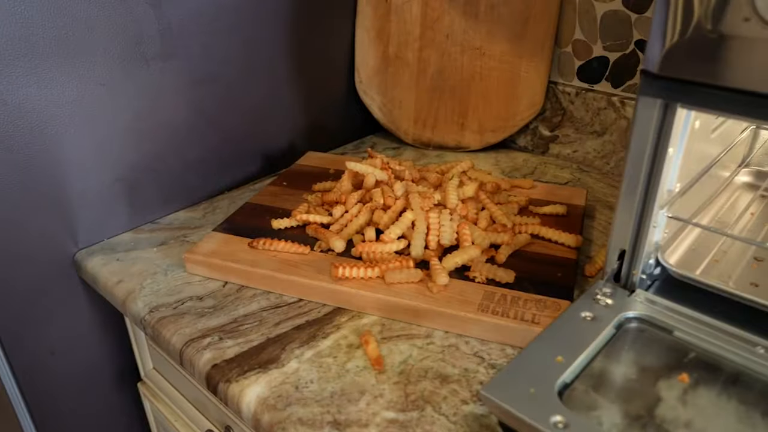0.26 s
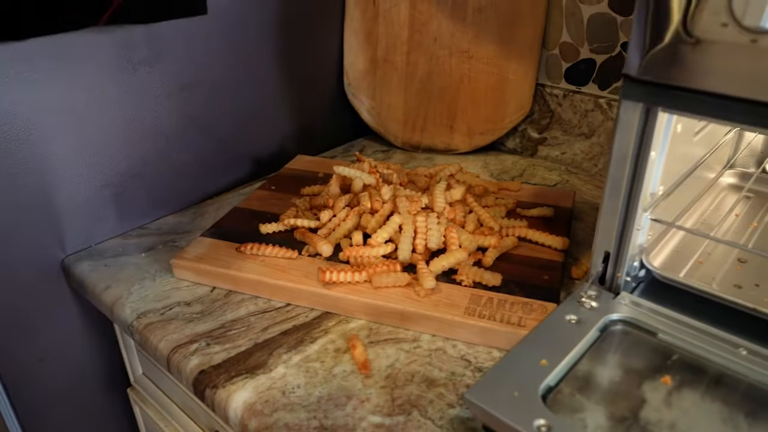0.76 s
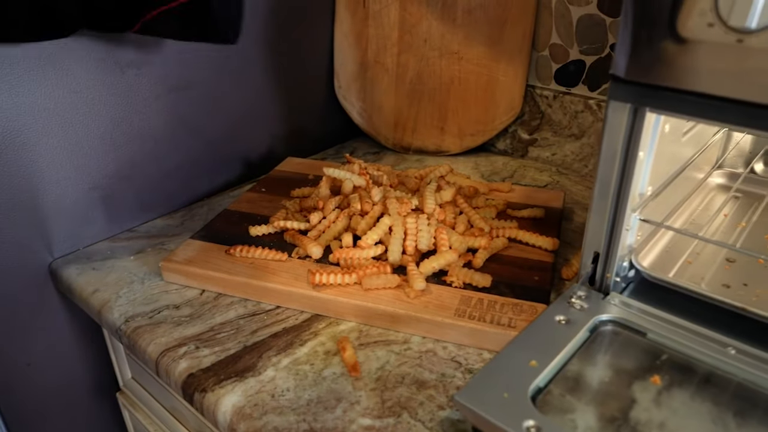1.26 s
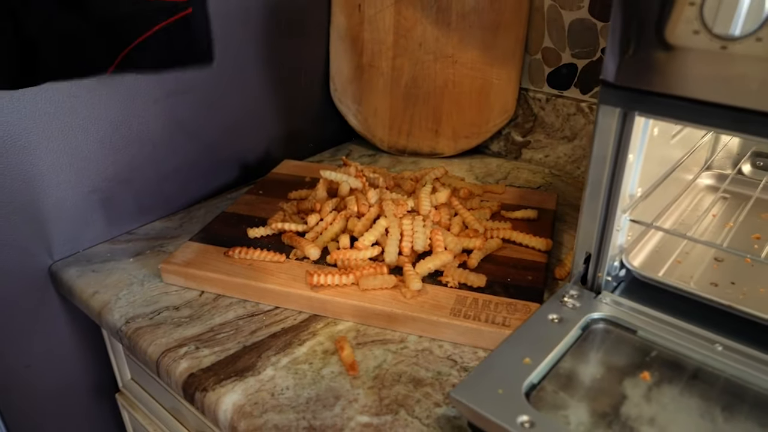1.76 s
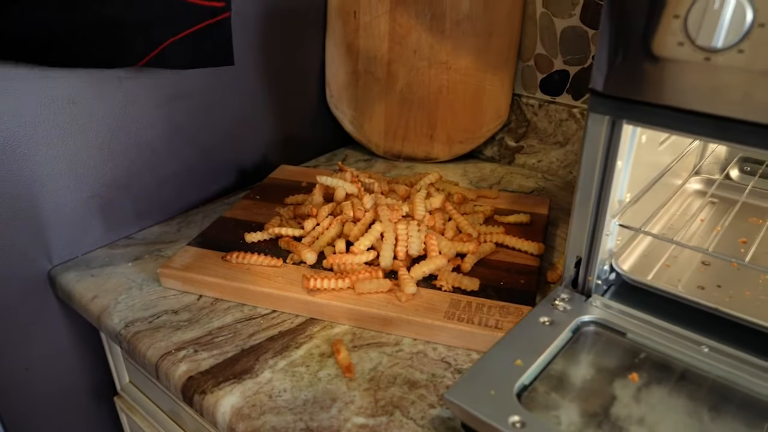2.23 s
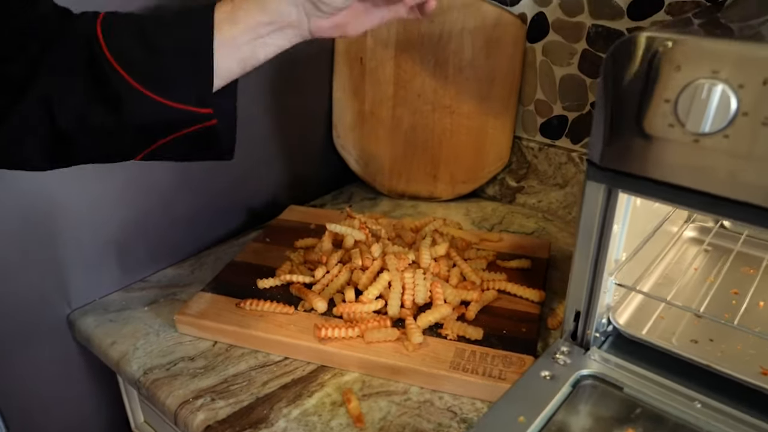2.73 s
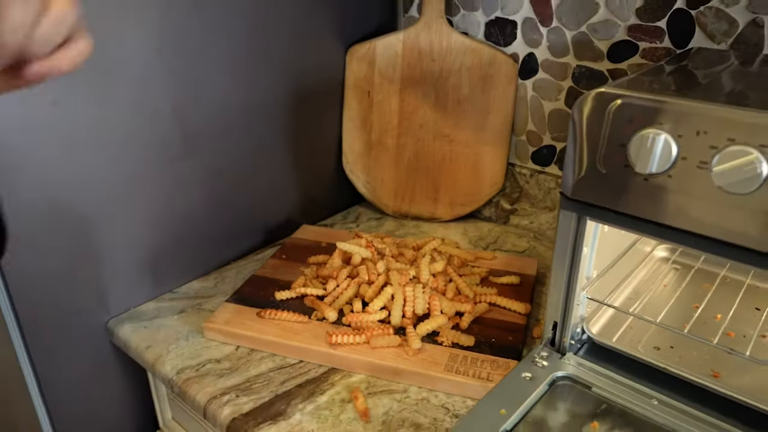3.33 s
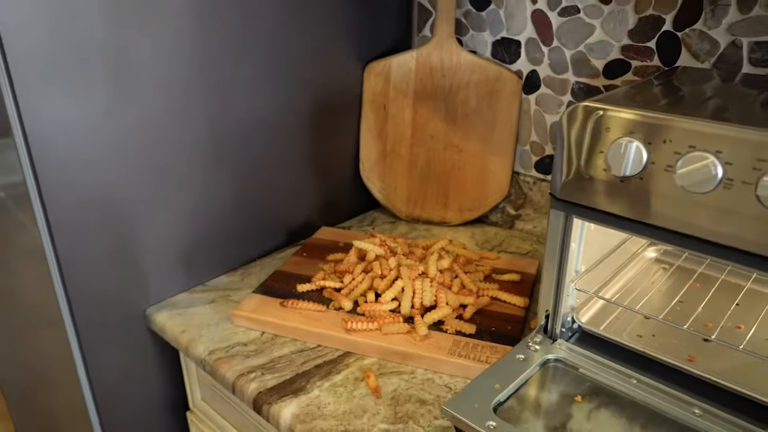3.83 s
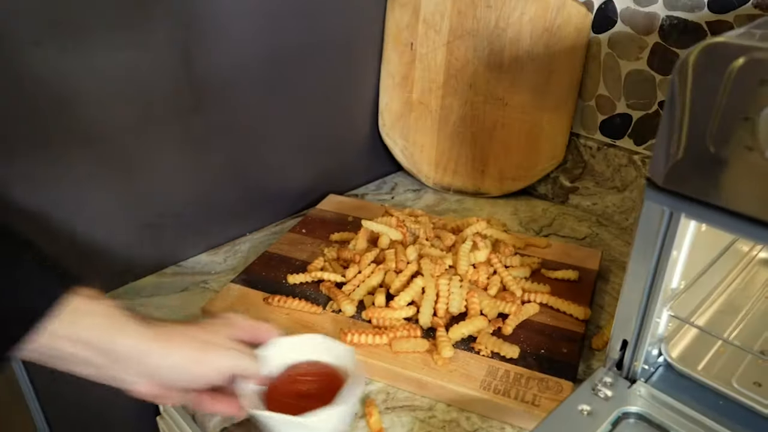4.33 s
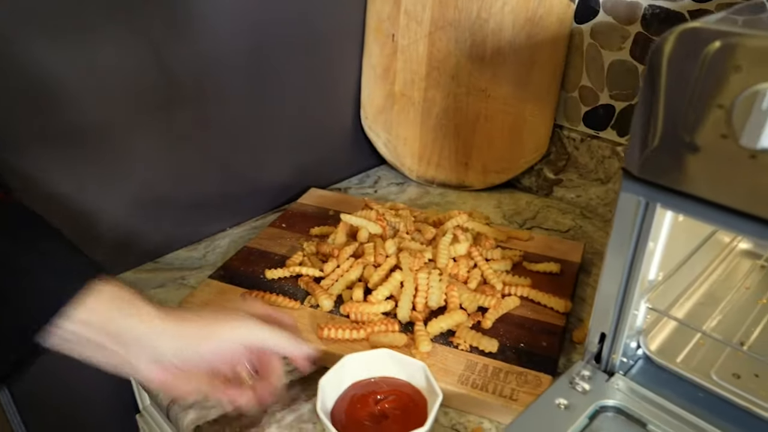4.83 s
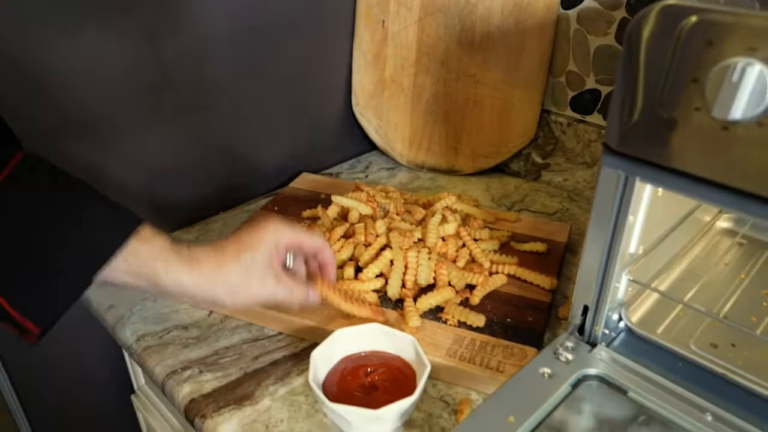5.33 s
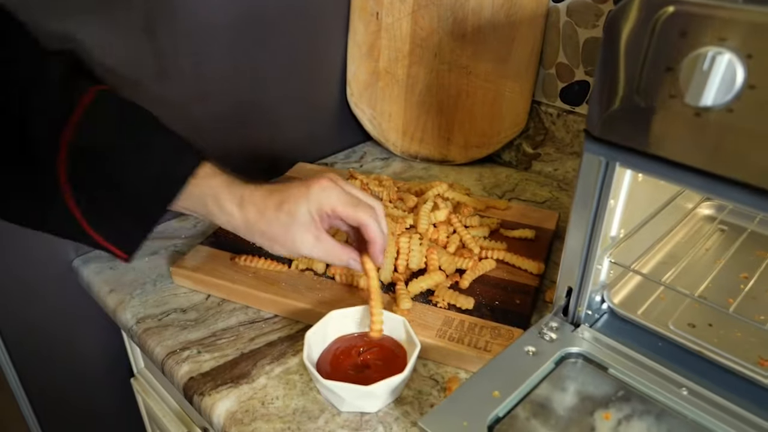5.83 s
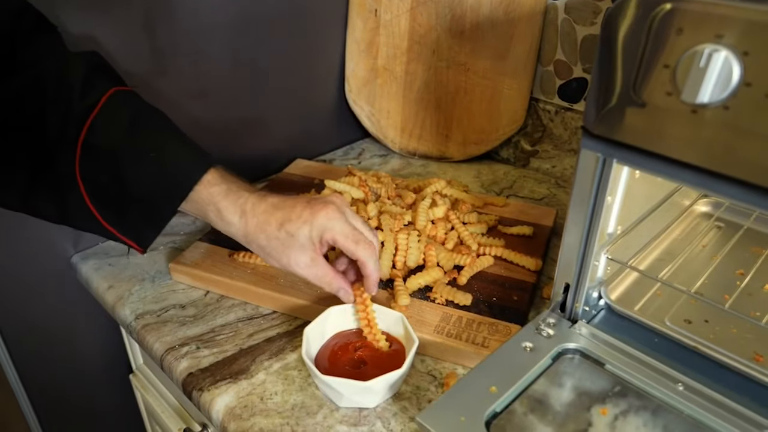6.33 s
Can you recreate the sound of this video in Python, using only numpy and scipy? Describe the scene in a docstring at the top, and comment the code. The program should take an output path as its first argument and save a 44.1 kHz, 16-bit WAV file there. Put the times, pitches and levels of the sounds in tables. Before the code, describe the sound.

In a small kitchen with a faint appliance hum and hiss, a salt shaker is shaken over fries in nine quick, gritty strokes, the grains rattling back between them. A sleeve rustles softly. Then a small ceramic bowl is set down on the counter with a sharp clink and briefly rocks to rest. A few light ticks follow as a fry is picked up. Everything sounds fairly close, with slight room reflections.

```python
"""Over a faint appliance hum and a hiss of air, salt slides in a tipped shaker and is shaken over fries.
Each of nine strokes throws the grains against the cap, exciting the hollow body; then they rattle back.
A sleeve rustles by friction. A small ceramic bowl, set down by a wooden board, rings in its normal modes
as it rocks to rest, and a fry is picked up with a few light ticks. A small kitchen reflects these sounds."""
import sys
import numpy as np
from scipy import signal
from scipy.fft import rfft, irfft
from scipy.io import wavfile

SR = 44100
rng = np.random.default_rng(int(sys.argv[2]) if len(sys.argv) > 2 else 0)


def to_wav(sig):
    """Store sig (one row per channel, or 1-D mono) as 16-bit WAV at the path in sys.argv[1].

    Samples outside -1..1 are clipped; the rate is SR.
    """
    pcm = np.clip(np.atleast_2d(sig), -1, 1) * 32767
    pcm = np.round(pcm).astype(np.int16)
    wavfile.write(sys.argv[1], SR, pcm.T)  # frames by channels


N = 289631
TIME = np.arange(N) / SR

# salt thrown at the cap: (start [s], length [s], level [dB], grit [dB], cavity pitch [ratio])
THROWS = [(0.501, 0.084, -29, 1, 1.12), (0.878, 0.041, -24.5, -1.5, 0.97), (1.183, 0.052, -26, -1.5, 0.94),
          (1.492, 0.044, -26, 0.5, 0.99), (1.776, 0.04, -29.5, 0.5, 1.11), (2.061, 0.057, -27, -1, 1.1),
          (2.357, 0.055, -30.5, 0.2, 1.05), (2.643, .057, -29.5, -0.1, 1.03),
          (2.933, 0.055, -26, -4.5, 1.03)]
# salt sliding as the shaker tips, then falling back after each throw: (start [s], length [s], level [dB])
RETURNS = [(0.231, 0.07, -46), (.314, 0.035, -39.5), (0.39, 0.048, -51), (0.688, 0.075, -42.5),
           (1.016, 0.059, -39.5), (1.331, 0.064, -42), (1.631, 0.045, -37.5), (1.913, .068, -42),
           (2.217, 0.069, -42), (2.498, 0.083, -40), (2.778, 0.081, -44.5)]


def from_db(db):
    """Decibels as an amplitude ratio."""
    return 10 ** (np.asarray(db) / 20)


def rms_one(x):
    """Normalisation to unit power."""
    return x / np.sqrt(np.mean(x ** 2) + 1e-20)


def at_hz(points, hz):
    """Interpolation on a log-frequency axis."""
    frequencies, values = np.transpose(points)
    return np.interp(np.log(np.maximum(hz, 1)), np.log(frequencies), values)


def colour(x, spectrum, size=8192):
    """Minimum-phase filter with the given spectrum; white noise keeps its power."""
    gain = from_db(at_hz(spectrum, np.fft.rfftfreq(size, 1 / SR)))
    cepstrum = irfft(np.log(gain))
    response = irfft(np.exp(rfft(2 * cepstrum[:size // 2], size)))
    return signal.fftconvolve(x, response / np.linalg.norm(response))[:N]


def resonance(x, hz, width):
    """Damped two-pole resonator with unit peak gain."""
    r = np.exp(-np.pi * width / SR)
    feedback = [1, -2 * r * np.cos(2 * np.pi * hz / SR), r * r]
    return signal.lfilter(np.array([1, 0, -1]) * (1 - r * r) / 2, feedback, x + 1e-18)


def low_pass(x, hz):
    """First-order smoothing."""
    r = np.exp(-2 * np.pi * hz / SR)
    return signal.lfilter([1 - r], [1, -r], x + 1e-18)


def add(out, s, sound):
    """Superposition of a short sound at time s."""
    at = int(round(s * SR))
    out[at:at + len(sound)] += sound[:N - at]


def swell(s, half):
    """Bell-shaped envelope of height 1 around time s."""
    return 1 / (1 + ((TIME - s) / half) ** 2 / 2) ** 2


def drift(hz):
    """Random fluctuation, mostly slower than hz; rms 1."""
    return rms_one(low_pass(low_pass(rng.standard_normal(N), hz), hz))


def narrow_noise(hz, width):
    """Narrow-band noise, heard as an unsteady tone; rms 1."""
    return rms_one(resonance(resonance(rng.standard_normal(N), hz, width), hz, width))


def bursts(rows, t60, size=4096):
    """Exponentially decaying micro-impacts for each (time [s], level [dB])."""
    out = np.zeros(N)
    for s, db in rows:
        add(out, s, rng.choice([-1, 1], size) * from_db(db - 60 * TIME[:size] / t60))
    return out


def grains(per_s, spread_db):
    """Shot noise: independent clicks of uneven size; rms 1."""
    sizes = from_db(spread_db * np.minimum(rng.exponential(1, N), 4)) * rng.choice([-1, 1], N)
    return rms_one(sizes * (rng.random(N) < per_s / SR))


def background():
    """Broadband air noise and a frequency-modulated motor hum; throb and rumble lie mostly on the left."""
    # spectra of the air and the rumble: (frequency [Hz], level [dB])
    air_spectrum = [(20, 8.5), (60, -7), (95, 2.5), (170, -1), (400, -4), (800, -6.5), (1500, -5),
                    (2400, -8.5), (3500, -6.5), (5000, -16.5), (7000, -24), (10000, -30.5), (13000, -33.5),
                    (16000, -56)]
    rumble_spectrum = [(15, -10), (37, 0.5), (50, -0.5), (65, -7.5), (95, -5), (160, -25), (300, -21.5),
                       (700, -32.5), (2000, -54)]
    # unsteady part of the hum: (frequency [Hz], bandwidth [Hz], level [dB])
    hum_bands = [(93.7, 8.1, -71.5), (241.1, 10, -70)]
    # the motor tone grows as the listening point moves: (time [s], level [dB])
    motor_levels = [(3.5, -69), (5, -62)]
    # swells of the low throb: (time [s], half length [s], level [dB])
    throbs = [(0.0, .12, -50), (1.6, 0.38, -52)]
    air = from_db(-61) * colour(rng.standard_normal(N), air_spectrum)
    hum = sum(from_db(db) * narrow_noise(hz, width) for hz, width, db in hum_bands)
    motor_hz = 242 + 2.434 * drift(hz=3.0)
    motor_gain = from_db(np.interp(TIME, *np.transpose(motor_levels)))
    motor = motor_gain * np.sin(2 * np.pi * np.cumsum(motor_hz) / SR)
    throb = sum(from_db(db) * swell(s, half) for s, half, db in throbs) * narrow_noise(hz=75, width=37)
    rumble = from_db(-52) * colour(rng.standard_normal(N), rumble_spectrum)
    return air + hum + motor + throb * from_db([[0], [-11.5]]) + rumble * from_db([[0], [-20]])


def kitchen(x, wet_db, early_db, size=32768):
    """Reverberation: early reflections and a diffuse tail in which each band decays at its own rate."""
    # reflections off counter and walls: (delay [s], level [dB])
    echoes = [(.0031, -13.5), (.0083, -10), (0.0128, -20), (0.0275, -27), (.0335, -29)]
    # spectrum of the tail: (frequency [Hz], level [dB])
    tail_spectrum = [(100, 6.5), (1000, 3), (2000, -1), (4000, 0.5), (8000, -7), (16000, -2.5)]
    # reverberation time: (frequency [Hz], T60 [s])
    decay_times = [(100, 0.91), (500, 0.55), (1800, 0.46), (4000, 0.6), (8000, 0.26), (16000, 0.75)]
    t, tail = TIME[:size], np.zeros(size)
    edges = np.geomspace(60, 17000, 11)
    for low, high in zip(edges, edges[1:]):
        hz = np.sqrt(low * high)
        band_pass = signal.butter(2, [low, high], "band", fs=SR, output="sos")
        band = signal.sosfilt(band_pass, rng.standard_normal(size))
        tail += band * from_db(at_hz(tail_spectrum, hz) - 60 * t / at_hz(decay_times, hz))
    tail *= np.minimum(t / 0.004, 1)
    response = from_db(wet_db) * tail / np.linalg.norm(tail)
    for delay, db in echoes:
        add(response, delay, from_db([db + early_db]))
    return x + signal.fftconvolve(x, response)[:N]


def sleeve():
    """Friction noise: cloth fibres slip in short swells, each with its own brightness."""
    # moves of sleeve and hand: (time [s], half length [s], level [dB], treble gain [dB])
    moves = [(.01, 0.051, -52.5, -25), (3.353, 0.026, -48, -24), (3.531, 0.027, -49.5, 3),
             (3.696, 0.021, -50, -20), (4.055, 0.017, -46, 6), (4.137, 0.045, -49.5, -6.5),
             (5.203, .013, -58.5, -11), (5.412, 0.012, -59.5, 8), (6.14, 0.053, -49, -17)]
    # spectrum of the cloth: (frequency [Hz], level [dB])
    cloth_spectrum = [(400, -10.5), (1200, -7.5), (2200, -3.5), (3600, 2.5), (5500, -5.5), (8000, -14.5),
                      (11000, -22), (16000, -33)]
    fibres = colour(grains(per_s=9100, spread_db=-1.5), cloth_spectrum)
    dull = low_pass(fibres, 3750)
    return sum(from_db(db) * swell(s, half) * (dull + from_db(treble_db) * (fibres - dull))
               for s, half, db, treble_db in moves)


def fry_ticks():
    """Heavily damped impacts as a fry is picked up; the hand also grazes the bowl."""
    # light touches: (time [s], level [dB], frequency [Hz], bandwidth [Hz])
    touches = [(5.4253, -43.5, 7040, 2040), (5.427, -34, 3100, 2400), (5.468, -54, 7600, 5950),
               (5.619, -29.5, 2040, 1650), (5.6188, -55.5, 9000, 7000), (5.789, -36.5, 3500, 1000)]
    taps = sum(resonance(resonance(bursts([(s, db)], t60=0.019), hz, width), hz, width)
               for s, db, hz, width in touches)
    graze = bowl_ring([(5.4253, -47.5, 9000)])
    return from_db(3) * taps + graze


def bowl_ring(blows, size=32768):
    """Modal ringing after each (time [s], level [dB], cutoff [Hz]); soft blows barely excite high modes."""
    # normal modes of the bowl: (frequency [Hz], level [dB], T60 [s])
    modes = [(1240, -19, .04), (1535, -3, 0.02), (1670, -8.5, .018), (1787, 3.5, 0.053), (1784, -20, 0.17),
             (1870, -17.5, .34), (1910, -8, 0.052), (2200, -18, 0.017), (2497, -1, 0.028),
             (2643, -3.5, 0.029), (2910, -3, .03), (3270, -11.5, .045), (3460, -7, 0.031),
             (3840, -9, 0.041), (4040, -8.5, .07), (4100, -18.5, 0.14), (4500, -10, .038), (5300, -17, .02),
             (6600, -9, 0.019), (7100, -24, 0.056)]
    hz, mode_db, t60 = np.array(modes).T[:, :, None]
    out, t = np.zeros(N), TIME[:size]
    vibrations = np.exp(-np.log(1000) * t / t60) * np.sin(2 * np.pi * hz * t)
    for s, db, cutoff_hz in blows:
        strength = from_db(db + mode_db + rng.normal(0, 1.6, hz.shape))
        strength /= np.hypot(1, (hz / cutoff_hz) ** 2)
        sign = rng.choice([-1, 1], hz.shape)
        ring = np.sum(sign * strength * vibrations, axis=0)
        add(out, s, ring * np.minimum(t / 0.00057, 1))   # the contact takes a moment to build
    return out


def bowl():
    """Impact excitation: each landing gives a ceramic ring, a contact transient and a thud in the wood."""
    # the bowl lands and rocks: (time [s], level [dB], contact cutoff [Hz], thud level [dB])
    landings = [(4.3176, -15, 13300, -39), (4.3213, -23.5, 4500, -41), (4.4046, -25.5, 4450, -38.5),
                (4.478, -28, 3200, -35), (4.4882, -29, 2000, -48), (4.509, -33.5, 1770, -59),
                (4.5412, -39.5, 1560, -48)]
    # spectra of the contact crack and the wooden thud: (frequency [Hz], level [dB])
    crack_spectrum = [(500, -15.5), (1100, -8), (1500, 4.5), (2700, -0.5), (4300, 0), (6800, -10.5),
                      (8000, -39), (11000, -32), (16000, -41)]
    thud_spectrum = [(40, -13), (85, 3), (130, 5), (290, -5), (560, 3.5), (680, -3), (860, 4.5),
                     (1100, -3.5), (1600, -8.5), (3000, -36), (9000, -60)]
    ring = bowl_ring([row[:3] for row in landings])
    contact = 0
    for s, db, cutoff_hz, _ in landings:
        crack = from_db(3.5) * colour(bursts([(s, db)], t60=0.022), crack_spectrum)
        snap = from_db(-11) * bursts([(s, db)], t60=0.004)
        softness = signal.butter(3, cutoff_hz, fs=SR, output="sos")
        contact += signal.sosfilt(softness, crack + snap + 1e-18)
    thud = colour(bursts([(s, thud_db) for s, _, _, thud_db in landings], t60=0.075), thud_spectrum)
    return from_db(0.5) * (ring + thud) + contact


def salt_grains(per_s, spread_db, clump_db, clump_hz, pings_per_s, ping_width_hz, ping_db, count=24):
    """Modulated shot noise: grains land in clumps; larger ones ping, more briefly at high pitch; rms 1."""
    pitches = np.geomspace(1400, 12000, count)
    pings = sum(resonance(grains(pings_per_s / count, spread_db), hz, ping_width_hz * hz / pitches[0])
                for hz in pitches)
    impacts = grains(per_s, spread_db) + from_db(ping_db) * rms_one(pings)
    return rms_one(impacts * from_db(clump_db * drift(clump_hz)))


def shower(hail, start, length, shape, size=12000):
    """Envelope of a granular flow: it starts at once, thickens, eases and dies away."""
    start_db, peak_share, end_db, release_s = shape
    t, at = TIME[:size], int(start * SR)
    flow_db = np.interp(t / length, [0, peak_share, 1], [start_db, 0, end_db])
    release_db = 20 * np.maximum(t - length, 0) / release_s
    return hail[at:at + size] * from_db(flow_db - release_db)


def falling_back():
    """Sparse collisions: loose grains scatter down the wall."""
    # flow envelope: (start [dB], peak position [share of length], end [dB], time to fall 20 dB [s])
    envelope = (-0.5, 0.3, -3, 0.06)
    hail = salt_grains(per_s=2000, spread_db=2.5, clump_db=4.0, clump_hz=101.5,
                       pings_per_s=1100, ping_width_hz=69, ping_db=-0.5)
    out = np.zeros(N)
    for start, length, db in RETURNS:
        add(out, start, from_db(db) * shower(hail, start, length, envelope))
    return out


def coarse_strikes(strokes, first_db, follower_db, count, rebound_s=0.0135, scatter_db=2.5):
    """Collisions as (time [s], level [dB]): a crystal leads each stroke and rebounds, a few follow."""
    strikes = []
    for start, length, db, *_ in strokes:
        shares = (np.arange(count) + rng.uniform(0.62, 1, count)) / count
        later = start + rebound_s + shares * (length - rebound_s)
        strikes += [(start, db + first_db), (start + rebound_s, db + first_db)]
        strikes += zip(later, db + follower_db + scatter_db * rng.standard_normal(count))
    return strikes


def crystals(t60=0.012, size=2048):
    """Point excitation: each coarse crystal clicks and rings the wall at a pitch set by where it lands."""
    # single crystals that stand out: (time [s], level [dB])
    lone_strikes = [(.316, -26), (0.779, -38), (1.102, -33.5), (1.478, -36.5), (1.817, -22.5), (1.983, -34),
                    (2.564, -32), (2.808, -33.5), (2.858, -34.5)]
    strikes = coarse_strikes(THROWS, first_db=-9, follower_db=-7.5, count=2)
    strikes += coarse_strikes(RETURNS, first_db=4.5, follower_db=2.5, count=3) + lone_strikes
    out = np.zeros(N)
    for (s, db), hz in zip(strikes, rng.uniform(2030, 4840, len(strikes))):
        click = rng.choice([-1, 1], size) * from_db(db - 60 * TIME[:size] / t60)
        add(out, s, click + from_db(3) * resonance(click, hz, width=174))
    return out


def salt_on_cap():
    """Cavity resonance: salt hits the cap and drives air modes, whose balance shifts as it piles up."""
    # air modes: (frequency [Hz], bandwidth [Hz], level [dB], rise per half throw [dB])
    cavity_modes = [(1560, 250, .5, 0.5), (2207, 157, 3, 2), (3180, 390, 3, 0.7)]
    # flow envelope: (start [dB], peak position [share of length], end [dB], time to fall 20 dB [s])
    envelope = (-8.5, 0.4, -3, 0.04)
    # spectrum of salt on the cap: (frequency [Hz], level [dB])
    cap_spectrum = [(300, -45.5), (700, -24.5), (1050, -17), (1400, -9), (2200, -3), (3300, -5.5),
                    (4200, -5.5), (5200, -9), (7500, -9.5), (10500, -15), (13000, -20.5), (16000, -31.5)]
    hail = salt_grains(per_s=6000, spread_db=2.0, clump_db=2.0, clump_hz=145,
                       pings_per_s=2600, ping_width_hz=63, ping_db=-2.5)
    out = np.zeros(N)
    for start, length, db, grit_db, pitch in THROWS:
        drive = shower(hail, start, length, envelope)
        piled = np.interp(TIME[:len(drive)], [0, length], [-1, 1])
        hollow = sum(resonance(drive * from_db(mode_db + rise_db * piled), hz * pitch, width)
                     for hz, width, mode_db, rise_db in cavity_modes)
        add(out, start, from_db(db) * (hollow + from_db(grit_db) * drive))
    return colour(out, cap_spectrum)


def shaker():
    """Forced vibration: dense throws drive the cap; loose grains and coarse crystals ring the wall."""
    # wall resonances: (frequency [Hz], bandwidth [Hz], level [dB])
    wall_modes = [(1590, 130, -18.5), (2280, 510, -10.5), (2990, 120, 3.5), (3300, 120, 2),
                  (7300, 550, -10.5), (10950, 1100, -2)]
    # spectrum of the loose rattle: (frequency [Hz], level [dB])
    rattle_spectrum = [(300, -32.5), (680, -29), (920, -10), (1100, -9.5), (1450, -3), (2200, -3.5),
                       (3300, -3), (4200, -5.5), (5200, -8.5), (7500, -10), (10800, -16.5), (13000, -22),
                       (16000, -27.5)]
    loose = from_db(-2) * falling_back() + from_db(1) * crystals()
    wall_ring = sum(from_db(db) * resonance(loose, hz, width) for hz, width, db in wall_modes)
    salt = from_db(-4) * salt_on_cap() + from_db(-2) * colour(loose + wall_ring, rattle_spectrum)
    # until the shaker is upside down the salt slides and is duller
    sliding_share = np.interp(TIME, [0.45, 0.72], [0.79, 0])
    return salt + sliding_share * (low_pass(salt, 5300) - salt)


def scene():
    """Superposition in one room: shaker and sleeve in the open, bowl and fry down on the counter."""
    in_the_open = kitchen(shaker() + sleeve(), wet_db=-18.5, early_db=-4.5)
    on_counter = kitchen(bowl() + fry_ticks(), wet_db=-13.5, early_db=-7.5)
    return in_the_open + on_counter + background()


def record(dry):
    """Soft saturation rounds the loudest peaks, and a steep low-pass cuts the highest treble."""
    ceiling, cutoff_hz = 0.6, 16200
    rounded = ceiling * np.tanh(dry / ceiling)
    return signal.sosfilt(signal.ellip(10, 0.3, 70, cutoff_hz, fs=SR, output="sos"), rounded)


dry = scene()
out = record(dry)
to_wav(out)
```